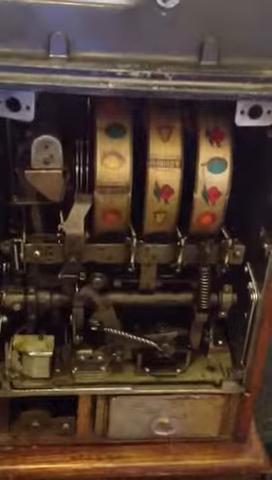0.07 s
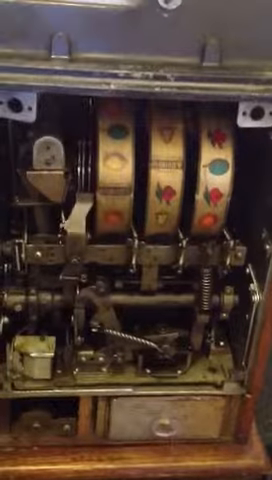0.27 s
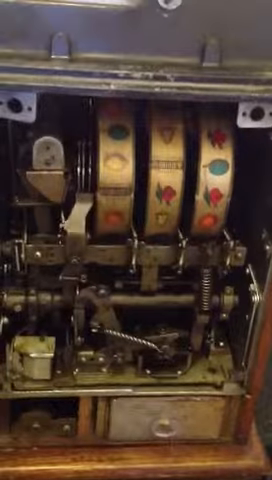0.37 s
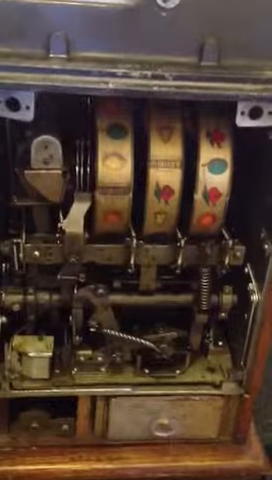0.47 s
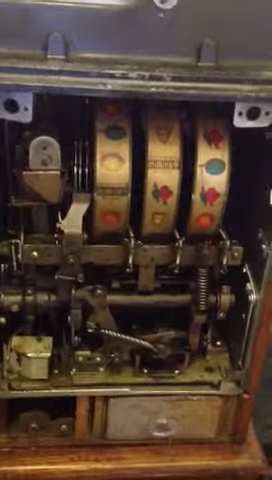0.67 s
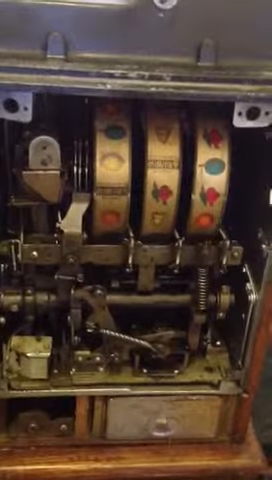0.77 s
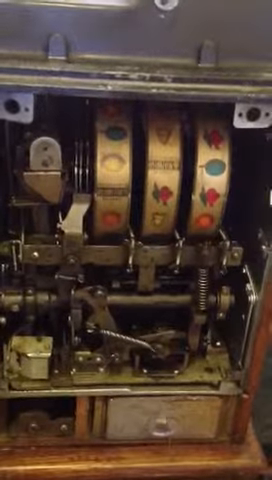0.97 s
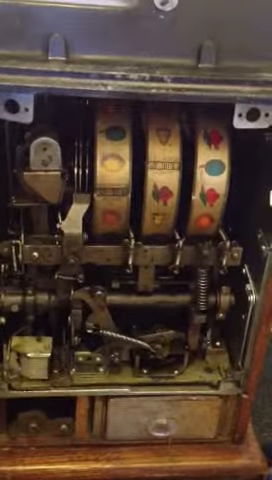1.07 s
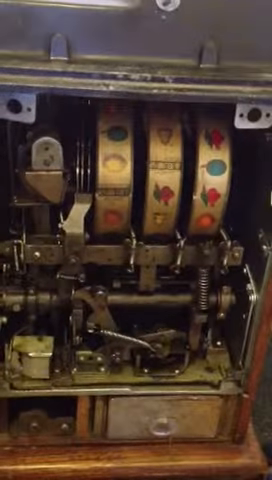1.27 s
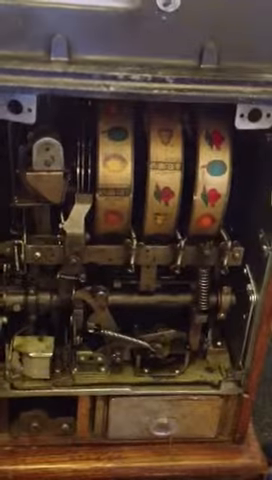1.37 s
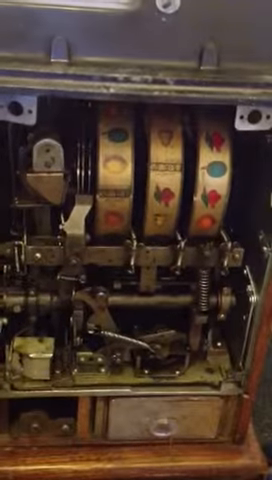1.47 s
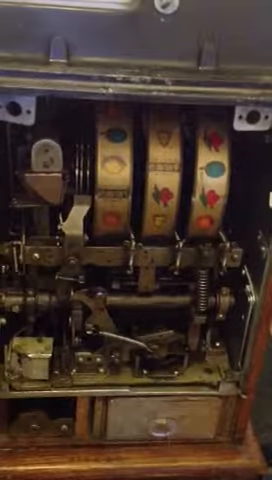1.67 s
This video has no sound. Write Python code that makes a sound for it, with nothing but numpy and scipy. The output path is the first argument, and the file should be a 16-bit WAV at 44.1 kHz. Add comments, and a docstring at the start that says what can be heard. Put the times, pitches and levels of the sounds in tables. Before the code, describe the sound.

An old slot machine's steel levers snap over in a quick, loud clatter. Lighter clicks follow with short spring pings and a thin, very high squeal, then a pause and one last clack, in a small room.

```python
"""Steel levers and pawls snap over one after another as an old slot machine's open mechanism cycles.
Each impact excites dense, damped resonances; heavy blows, like the clack that trips the wound-up works,
also shake the wooden cabinet and ring the steel frame. Springs twang in free vibration, sliding metal
squeals thinly by friction, and a last stop lever drops home. A small room reverberates over faint noise."""
import sys
import numpy as np
from scipy import signal
from scipy.fft import rfft, irfft, next_fast_len
from scipy.io import wavfile
from scipy.ndimage import map_coordinates

SR = 44100
rng = np.random.default_rng(int(sys.argv[2]) if len(sys.argv) > 2 else 0)


def digitize_waveform(pressure):
    """Quantize a signal to 16-bit integers and store it at the path in sys.argv[1].

    Rows of a 2-D input are taken as channels; values are limited to [-1, 1].
    """
    field = np.atleast_2d(pressure).T
    bounded = np.clip(field, -1, 1)
    quanta = np.round(bounded * 32767).astype(np.int16)
    wavfile.write(sys.argv[1], SR, quanta)


N = 74970
STEEL_RISE_S = 0.0016  # attack time constant of struck steel


def levers():
    """Impact excitation: each contact cracks, then chatters in a burst of dense steel resonances."""
    # impacts (time [s], level [dB], knock [dB], clank [dB], sheen [dB], decay time T60 [s]);
    # knock, clank and sheen are relative to the snap, the sheen before its boost
    contacts = [(0.2268, -31.5, -33, -8, 3.5, 0.21), (0.2524, -30.5, -2, -4.5, 6, .045),
                (0.2656, -21.5, 3.5, 1, 1, 0.14), (0.2837, -25.5, -1, -5, 2, 0.19),
                (0.295, -28, -24, -3.5, 2, 0.26), (0.3138, -23.5, 4.5, 0.5, 6.5, 0.07),
                (.325, -34, -6, -5, 12, 0.073), (0.345, -36, -24, -17, -17, 0.15),
                (0.372, -55, -20, -3, 1, 0.072), (0.4045, -38.5, -8, -7, -2.5, 0.077),
                (0.4617, -48.5, -20, -17, 0, 0.11), (0.4893, -48, -13, -16.5, -3.5, 0.1),
                (0.5951, -33.5, -15, -11, 4.5, 0.044), (0.6024, -31, -14.5, -16, 2, 0.12),
                (0.649, -26.5, -7.5, -4, 1, 0.093), (0.661, -30.5, -3.5, -2.5, 3.5, 0.13),
                (0.7015, -26, -17.5, -20, -2, 0.089), (.716, -40.5, -6, -2, 2, 0.18),
                (0.7547, -37.5, -4, -17, -6, 0.078), (0.779, -35, -11.5, -2, -2.5, 0.15),
                (0.7912, -32.5, -14, -1.5, -0.5, 0.085), (0.841, -36, -2.5, 0, -4, 0.089),
                (0.926, -37.5, -3, 6, -4.5, 0.023), (0.931, -32, 0, 6.5, -16, 0.084),
                (0.945, -47.5, -2, 14, -18, 0.15), (0.9838, -37.5, -5, 6, -27, 0.07),
                (1.0041, -33, -13, 1.5, -11, 0.094), (1.01, -36.5, -5, -6, -19, 0.17),
                (1.029, -33.5, -8.5, -0.5, -10, 0.18), (1.0376, -33, -3, -8, -3, 0.094),
                (1.069, -42.5, -1, -2, -25, 0.043), (1.140, -54, 5, 5.5, -5.5, 0.12),
                (1.1462, -48.5, 0, 1.5, -10, 0.1), (1.403, -54, -4, 1, -3.5, 0.083),
                (1.411, -47.5, 0.5, 3, 6.5, .06), (1.4182, -26.5, -2.5, -3.5, 0, 0.061),
                (1.424, -32, -3.5, 3, -8, 0.053)]
    # spectra of an impact's four parts, low to high (frequency [Hz], relative level [dB])
    knock = [(100, -46), (250, -24.5), (520, -6), (660, -5), (820, -5), (1250, -2), (1500, -14),
             (3000, -38)]
    clank = [(200, -53), (500, -21), (1300, -10), (1650, 3), (2200, -1.5), (2900, -2), (4500, -13.5),
             (9000, -59)]
    snap = [(300, -62), (1000, -40), (2500, -11.5), (3400, 0.5), (4700, 2), (5800, -6.5), (8000, -14),
            (15000, -39)]
    sheen = [(3500, -56), (5500, -7.5), (6700, 0.5), (8700, 1), (10500, -2), (12700, 2), (14800, -4),
             (15600, -19)]
    sheen_boost_db, dull_below_db, dull_from_hz = 4, 3, 6400
    crack_db, crack_s = 2, 0.0036
    out, t = np.zeros(N), np.arange(2 ** 14) / SR
    for start, db, knock_db, clank_db, sheen_db, t60 in contacts:
        slope = 2.1 * min(sheen_db - dull_below_db, 0)  # dB per octave: a weak sheen is also duller
        dulled = [(hz, level + slope * max(np.log2(hz / dull_from_hz), 0)) for hz, level in sheen]
        parts = [(snap, 0), (knock, knock_db), (clank, clank_db), (dulled, sheen_db + sheen_boost_db)]
        burst = sum(amp(level) * noise(spectrum, len(t), uneven_db=3.5) for spectrum, level in parts)
        chatter = amp(wobble(700, len(t)))
        envelope = fade(t, t60, STEEL_RISE_S, hold=0.0034)
        crack = amp(crack_db * np.exp(-t / crack_s))  # the first touch stands out
        add(out, start, amp(db) * burst * envelope * chatter * crack)
    return out


def cabinet_and_frame():
    """Modal response: under heavy blows the wooden cabinet booms briefly and the steel frame rings."""
    # heavy blows (time [s], thump level [dB], ring level [dB], tilt of the lower modes [dB/octave])
    blows = [(0.23, -45.5, -46, 3), (.267, -39, -22, -5.5), (.281, -32, -37, -11), (0.314, -44.5, -26, 1.5),
             (.597, -52.5, -43.5, 44), (.651, -47.5, -33, 43), (0.788, -49, -62, 2), (0.842, -77, -39.5, 7),
             (1.419, -38, -50.5, -12)]
    # spectrum of the cabinet's thump (frequency [Hz], relative level [dB])
    cabinet = [(30, -33), (90, -19), (125, -12), (170, -4.5), (240, 2.5), (330, -3), (450, -8.5),
               (700, -34), (2000, -60)]
    # modes of the frame (frequency [Hz], relative level [dB], decay time T60 [s])
    frame_modes = [(449, -9, .18), (738, -9, .2), (802, -4, .15), (843, -4, .13), (910, -3, .13),
                   (1030, -8, .1), (1117, 0, .15), (1200, -2, .15), (1275, -9, .13), (1518, -18, .2),
                   (1665, -15, .2), (1703, -16, .17), (2060, -15, .2)]
    pivot_hz = 1190  # a positive tilt weakens the modes below this frequency
    out, t = np.zeros(N), np.arange(SR // 2) / SR
    for start, thump_db, ring_db, tilt in blows:
        thump = noise(cabinet, len(t)) * fade(t, t60=0.33, rise=0.0015)
        ring = np.zeros(len(t))
        for hz, db, t60 in frame_modes:
            mode_db = db + tilt * min(np.log2(hz / pivot_hz), 0) + rng.normal(0, 1.5)
            ring += amp(mode_db) * fade(t, t60, STEEL_RISE_S) * tone(hz, width_hz=9.1, size=len(t))
        add(out, start, amp(thump_db) * thump + amp(ring_db) * ring)
    return out


def springs():
    """Damped free vibration: each plucked spring or struck lever rings at its natural frequency."""
    # ringing parts (time [s], frequency [Hz], level [dB], decay time T60 [s])
    pings = [(.228, 6613, -22, 0.066), (.228, 3488, -36, 0.2), (.2527, 4270, -25.5, .05),
             (0.2827, 12420, -12.5, 0.067), (0.314, 13200, -24, 0.096), (0.346, 3180, -26, 0.035),
             (0.346, 2920, -45, 0.31), (.4044, 3603, -30.5, 0.088), (0.4046, 4150, -29, 0.028),
             (.4907, 3570, -49.5, .12), (.4907, 4650, -39, 0.053), (0.6493, 8850, -23, 0.1),
             (0.7002, 4520, -29.5, .07), (.7552, 3646, -26, 0.042), (0.7546, 4000, -28, .04),
             (0.7912, 4780, -27, 0.063), (0.9315, 846, -29.5, 0.081), (0.9308, 1263, -25.5, 0.054),
             (1.0374, 665, -42, .12), (1.4185, 820, -32, 0.075), (1.4188, 2008, -40.5, 0.21)]
    out, t = np.zeros(N), np.arange(SR // 2) / SR
    for start, hz, db, t60 in pings:
        add(out, start, amp(db) * tone(hz, width_hz=26, size=len(t)) * fade(t, t60, STEEL_RISE_S))
    return out


def squeal():
    """Friction-excited vibration: sliding steel sings unevenly on two close, very high modes."""
    # envelopes of the two modes (time [s], upper mode level [dB], lower mode level [dB])
    envelopes = [(0.593, -82, -69), (.602, -45, -52), (.621, -31, -41), (.64, -32.5, -54),
                 (.685, -28, -32.5), (.73, -42, -47), (.765, -40, -32.5), (.83, -43, -55), (.853, -42, -43),
                 (.897, -47, -50), (.925, -46, -37.5), (.965, -46, -56.5), (1.03, -60, -48.5),
                 (1.052, -55, -44), (1.09, -62, -50), (1.13, -87, -81)]
    upper_hz, lower_hz = 14044, 13606
    roughness, flutter_db = 0.32, 2.5
    out = np.zeros(N)
    for column, hz in enumerate((upper_hz, lower_hz), start=1):
        level_db = curve([(row[0], row[column]) for row in envelopes])
        grip = 1 + roughness * wobble(310, N)
        out += amp(level_db) * grip * tone(hz, width_hz=18, size=N)
    return out * amp(flutter_db * wobble(100, N))


def room(sound):
    """Reverberation: convolution with a diffuse tail whose high frequencies die away soonest."""
    # decay of the room (frequency [Hz], reverberation time T60 [s])
    decay_times = [(150, 0.36), (500, 0.32), (2000, 0.31), (5000, 0.27), (10000, 0.2), (15000, 0.11)]
    hz, t, spectra = signal.stft(rng.standard_normal(SR // 2), SR, nperseg=256)
    decay = amp(-60 * t / along(decay_times, hz)[:, None])
    tail = signal.istft(spectra * decay, SR, nperseg=256)[1]
    delayed = np.pad(sound, (round(0.008 * SR), 0))  # reflections arrive 8 ms late
    return signal.fftconvolve(delayed, tail / np.linalg.norm(tail))[:N]


def background():
    """Ambient noise: a quiet broadband hiss and a low rumble, each slowly varying in level."""
    # noise spectra (frequency [Hz], relative spectral density [dB])
    hiss = [(15, -62), (25, -42), (229, -3), (394, -9.5), (516, -1.5), (1160, -8.5), (1400, -12.5),
            (1700, -7.5), (3080, -12), (3520, -16), (4740, -11.5), (9840, -15.5), (12200, -6),
            (14400, -17.5), (16000, -38)]
    rumble = [(25, -52), (60, -32), (110, -17), (150, -4.5), (230, 0.5), (300, -0.5), (400, -8),
              (700, -6.5), (1500, -31)]
    # noise envelopes (time [s], level [dB])
    hiss_level = [(0, -53), (.22, -56), (.56, -56.5), (1.3, -60), (1.65, -60.5)]
    rumble_level = [(0, -61), (.5, -62), (1.0, -61.5), (1.2, -60), (1.55, -64), (1.65, -57)]
    return amp(curve(hiss_level)) * noise(hiss, N) + amp(curve(rumble_level)) * noise(rumble, N)


def amp(db):
    """Amplitude ratio of a level in decibels."""
    return 10 ** (np.asarray(db) / 20)


def along(points, hz):
    """Interpolation of (frequency [Hz], value) points on a logarithmic frequency axis."""
    knots_hz, values = np.transpose(points)
    return np.interp(np.log(hz + 1), np.log(knots_hz + 1), values)


def curve(points):
    """Linear interpolation of (time [s], level [dB]) points at every sample."""
    return np.interp(np.arange(N) / SR, *np.transpose(points))


def wobble(rate, size):
    """Random modulation: a smooth curve through `rate` Gaussian values a second."""
    return map_coordinates(rng.standard_normal(size // 16), [np.arange(size) * rate / SR], mode="wrap")


def noise(spectrum, size, uneven_db=0, knot_spacing_hz=130.56):
    """Spectral shaping: coloured noise of rms 1, broken into random resonances by uneven_db."""
    hz = np.fft.rfftfreq(size, 1 / SR)
    peaks = map_coordinates(rng.standard_normal(len(hz)), [hz / knot_spacing_hz], mode="wrap")
    gain = amp(along(spectrum, hz) + uneven_db * peaks)
    shaped = irfft(rfft(rng.standard_normal(size)) * gain, size)
    return shaped / np.sqrt(np.mean(shaped ** 2) + 1e-20)


def tone(hz, width_hz, size):
    """Line broadening: a partial of rms 1 whose frequency wanders by about width_hz."""
    cycles = np.cumsum(hz + width_hz * wobble(120, size)) / SR + rng.random()
    return np.sqrt(2) * np.sin(2 * np.pi * cycles)


def fade(t, t60, rise, hold=0):
    """Exponential damping: an envelope that rises, holds, then falls 60 dB in t60 seconds."""
    return (1 - np.exp(-t / rise)) * amp(-60 * np.maximum(t - hold, 0) / t60)


def add(track, start, sound):
    """Superposition: mix a sound into the track from `start` seconds on."""
    part = track[round(start * SR):][:len(sound)]
    part += sound[:len(part)]


def scene():
    """Superposition: high-passed clacks and rings, their reverberation, the squeal and faint noise."""
    low_cut = signal.butter(2, 160, "high", fs=SR, output="sos")
    works = signal.sosfilt(low_cut, levers() + cabinet_and_frame() + springs())
    return (works + amp(-10.5) * room(works) + squeal() + background())[None]


def record(dry):
    """Soft saturation rounds off the highest peaks; a sharp low-pass then limits the bandwidth."""
    ceiling, hardness, top_hz = 0.72, 5, 15900
    rounded = dry / (1 + np.abs(dry / ceiling) ** hardness) ** (1 / hardness)
    size = next_fast_len(N + SR // 2)
    passband = np.fft.rfftfreq(size, 1 / SR) < top_hz
    return irfft(rfft(rounded, size) * passband, size)[..., :N]


dry = scene()
out = record(dry)
digitize_waveform(out)
```